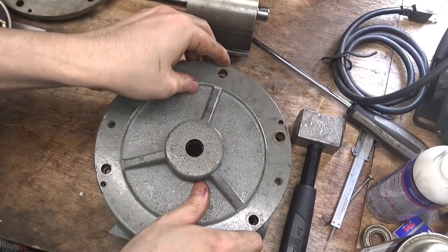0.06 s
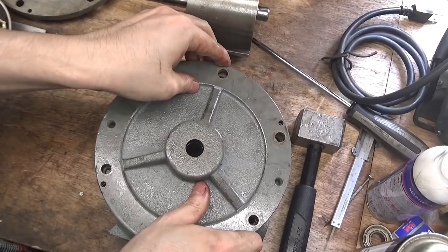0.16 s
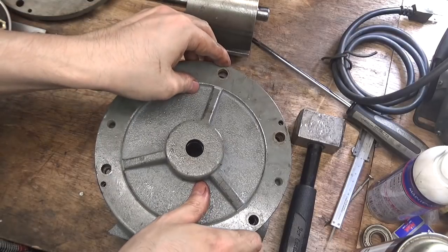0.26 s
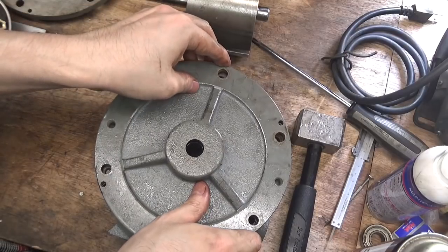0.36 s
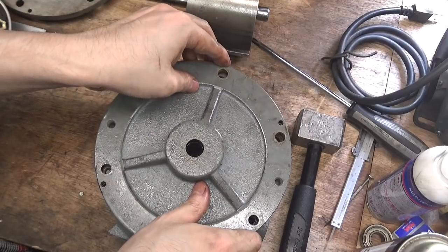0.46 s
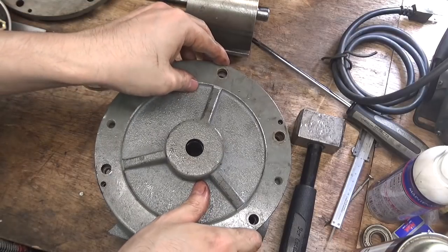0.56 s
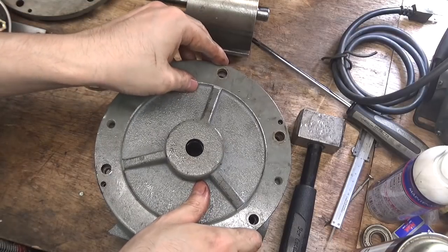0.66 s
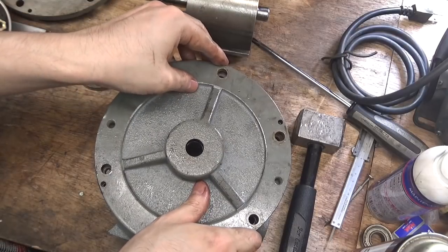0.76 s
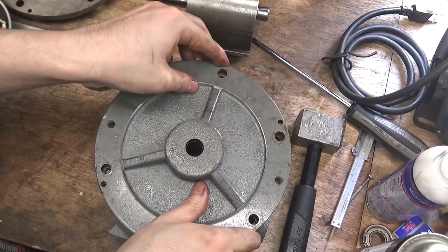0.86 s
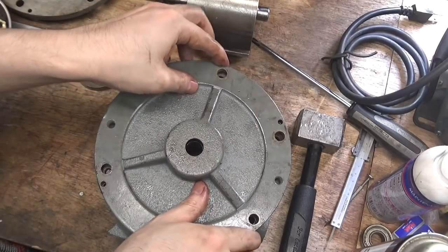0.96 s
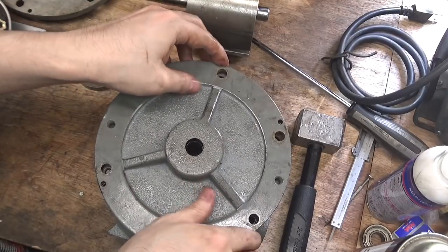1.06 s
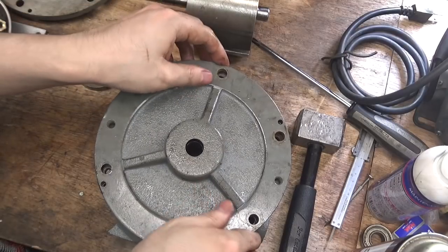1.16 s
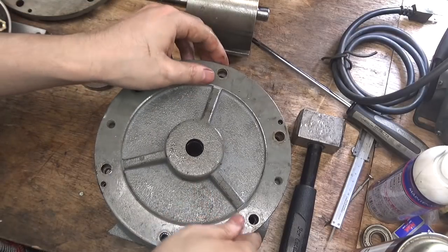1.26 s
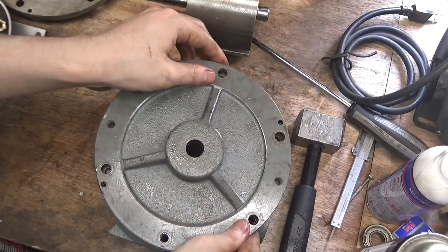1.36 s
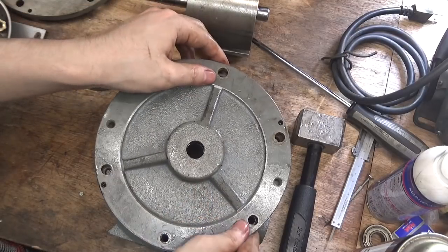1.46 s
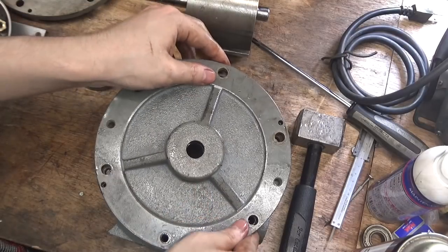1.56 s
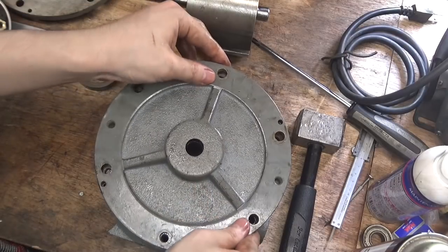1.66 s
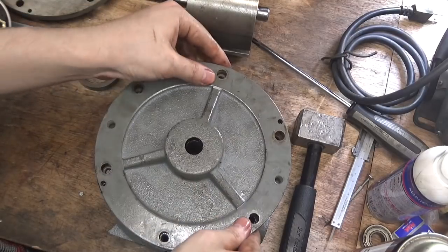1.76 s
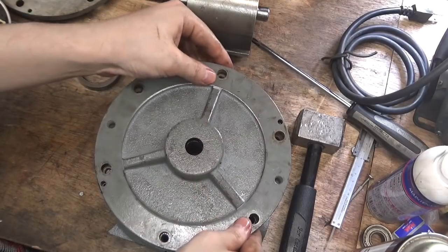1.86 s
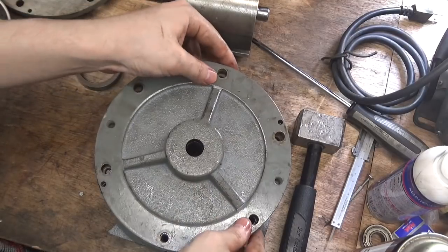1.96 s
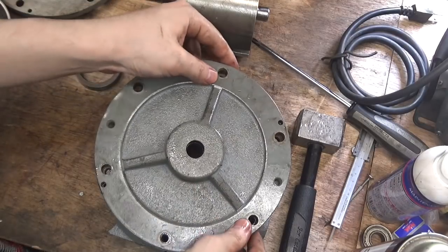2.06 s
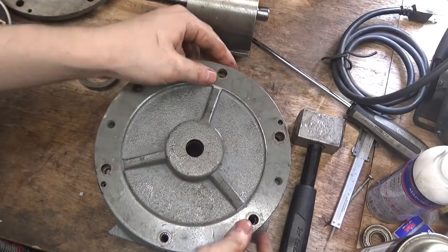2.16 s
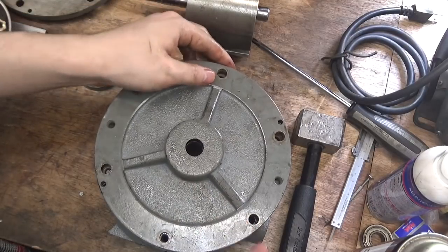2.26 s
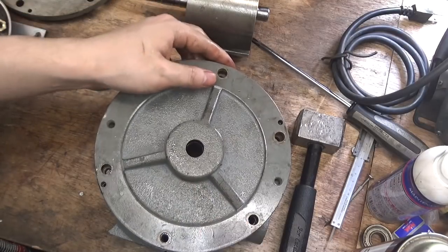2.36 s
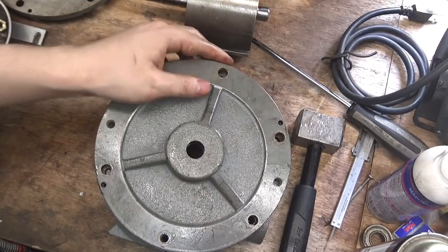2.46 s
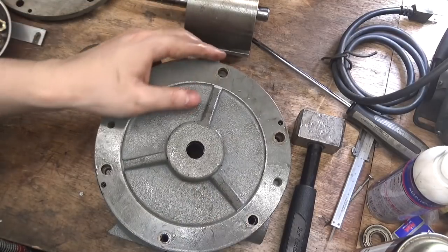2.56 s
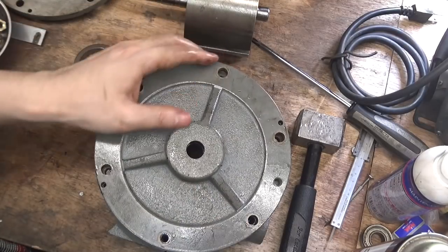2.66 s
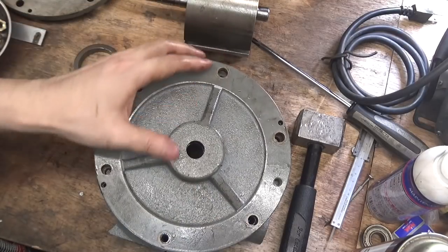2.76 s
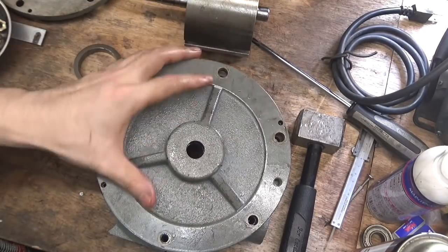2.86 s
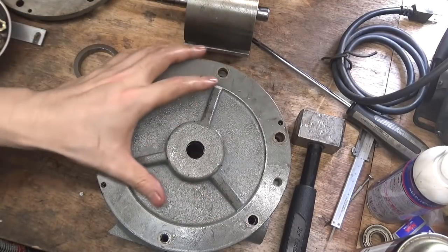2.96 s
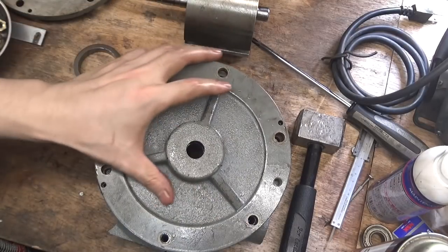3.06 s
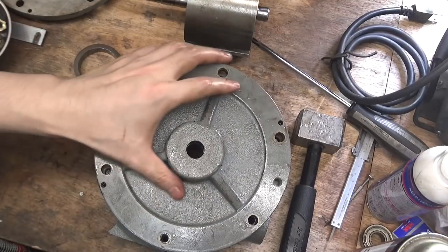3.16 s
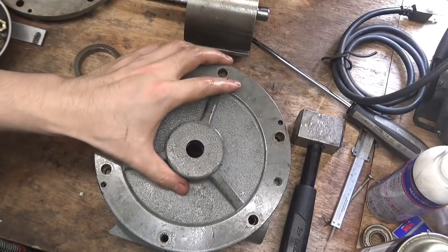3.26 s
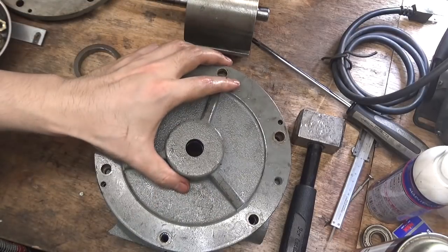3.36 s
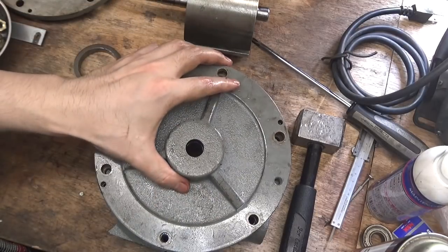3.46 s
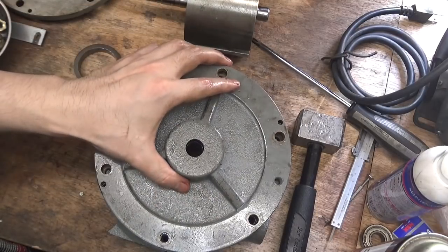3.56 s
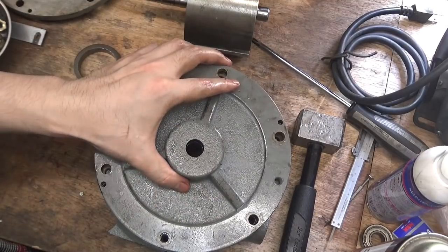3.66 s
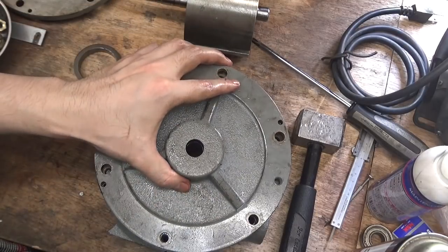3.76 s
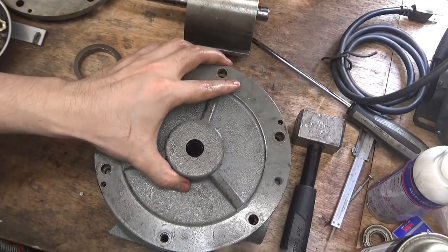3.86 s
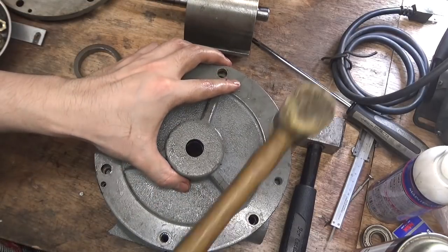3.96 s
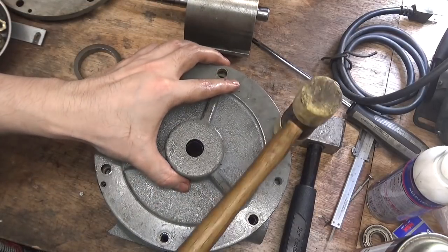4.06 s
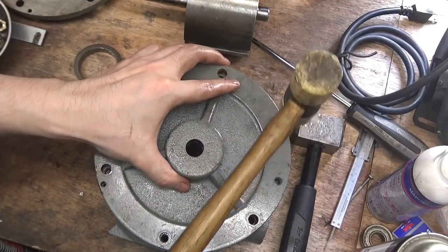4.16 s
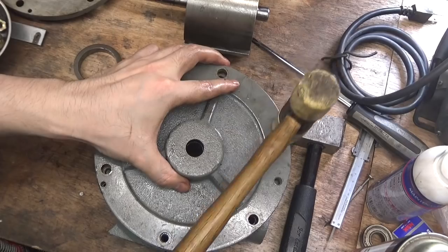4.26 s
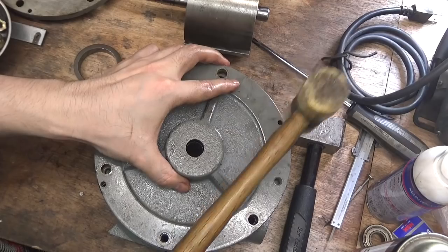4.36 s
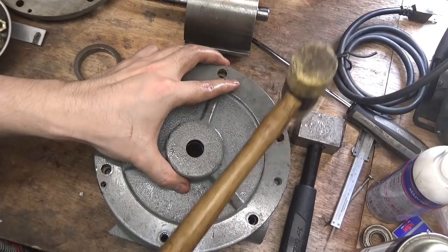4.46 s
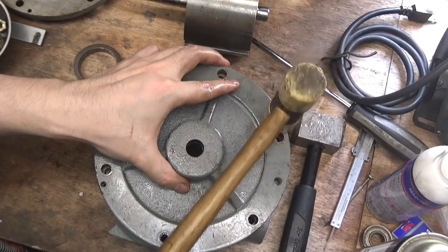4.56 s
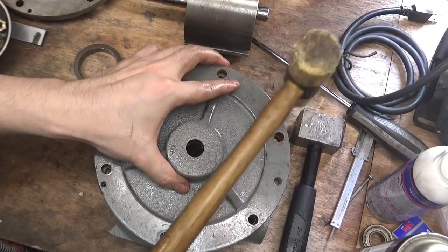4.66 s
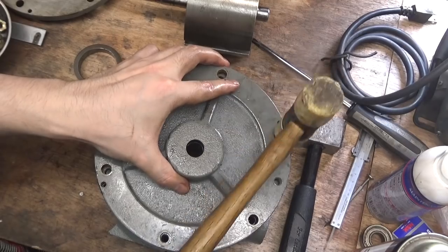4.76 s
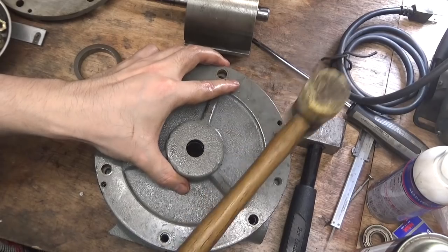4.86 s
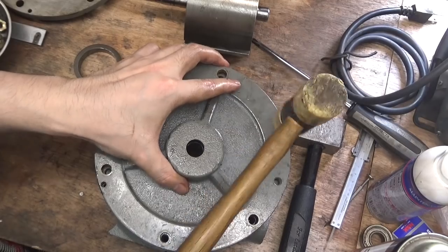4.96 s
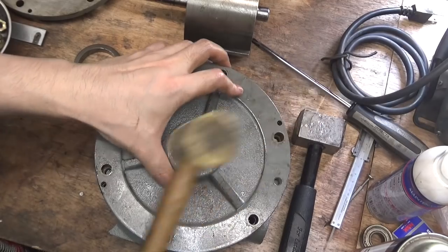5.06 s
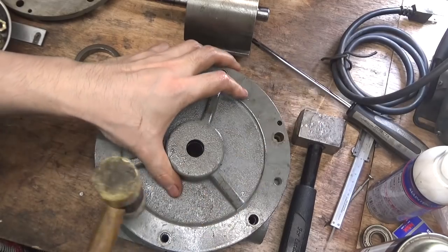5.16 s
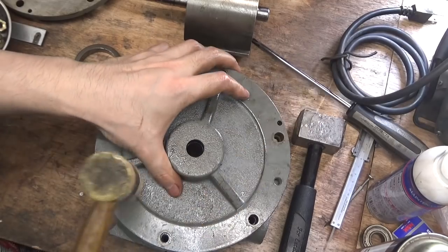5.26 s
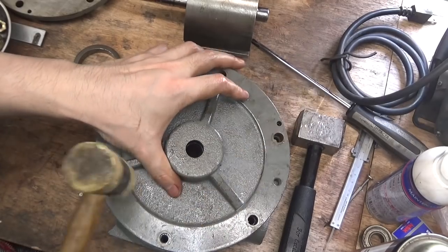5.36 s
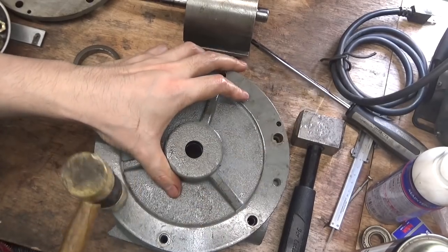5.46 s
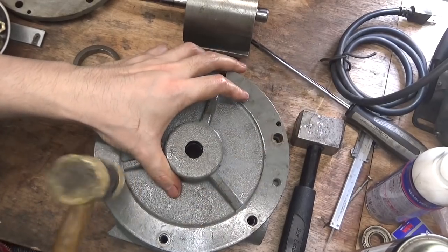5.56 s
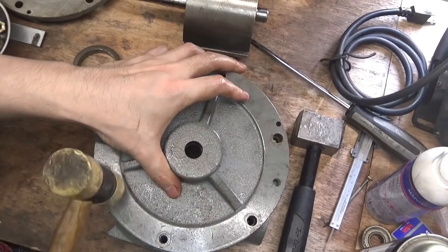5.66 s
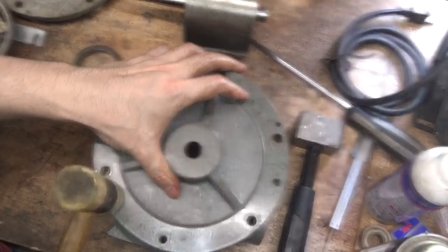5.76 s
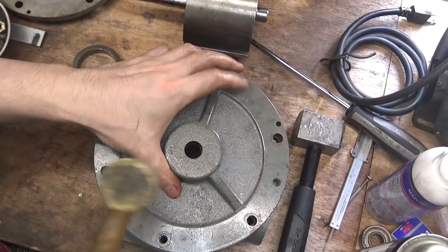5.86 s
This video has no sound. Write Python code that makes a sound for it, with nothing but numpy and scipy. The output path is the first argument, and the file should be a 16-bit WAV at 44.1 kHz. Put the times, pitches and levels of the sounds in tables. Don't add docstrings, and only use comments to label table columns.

```python
import sys
import numpy as np
from scipy import signal
from scipy.io import wavfile
from scipy.ndimage import uniform_filter1d

SR = 44100
rng = np.random.default_rng(int(sys.argv[2]) if len(sys.argv) > 2 else 0)


def natural_amplitude(level_db):
    exponent = np.asarray(level_db, float) / 20
    return 10 ** exponent


def digitize_waveform(pressure):
    field = np.atleast_2d(pressure).T
    bounded = np.clip(field, -1, 1)
    quanta = np.round(bounded * 32767).astype(np.int16)
    wavfile.write(sys.argv[1], SR, quanta)


N = 260631
TIME_S = np.arange(N) / SR

CUT_S, AS_SHOT, SPEED_UP = 3.557, 1, 1.935
AIR_DB, AIR_FAST_DB = -57, -71
HUM_HZ, FRAME_HZ = 58.75, 29.97
TICKS_PAUSE_START_S, TICKS_PAUSE_END_S = 3.76, 5.05
ROD_HZ, ROD_T60_S = 1430, 0.85
ROD_PRESSED_HZ, ROD_PRESSED_DAMPING = 1368, 3.3
ROOM_DB, ROOM_T60_S = -28, 1
LOWS_LAG_HZ = 400
LOW_MODE_HZ, LOW_CLEAN_DB, LOW_BUZZ_DB = 700, 7, -4
CLEAN_LONGER = 1.12
ROCK_HOLD_S, DROP_HOLD_S, SHOVE_HOLD_S, PICK_UP_HOLD_S = 0.025, 0.004, 0.018, 0.0017
FIRST_TAP_HOLD_S, RIGHT_HOLD_S, LEFT_HOLD_S = 0.0039, 0.02, 0.024

# (frequency [Hz], density [dB/Hz])
AIR = [(15, -58), (25, -15.5), (114, -19), (146, -15), (225, -4), (321, -13.5), (348, -6), (377, -11),
       (469, -4.5), (649, -6.5), (806, -7.5), (1770, -11), (3130, -14), (15100, -29), (16400, -36)]
AIR_FAST = [(15, -59), (25, -32), (53, -34), (181, -17), (231, -34), (321, -47), (456, -4), (537, -18),
            (667, 1), (743, -40), (1000, -49), (1090, -10.5), (3310, -18.5), (5390, -18.5), (16400, -32)]
# (frequency [Hz], likeness [0-1])
AIR_LIKENESS = [(60, 0.85), (150, 1), (300, 0.7), (550, 0.83), (1650, 0.54), (4970, 0.35), (15000, .4)]
HIT_LIKENESS = [(60, 0.93), (150, 0.98), (300, .92), (550, .9), (1650, 0.6), (4970, 0.7), (15000, 0.3)]
# (multiple [1], level [dB])
HUM = [(2, -77), (4, -74), (5, -73), (6, -64.5), (7, -70), (8, -67), (9, -68), (10, -71), (14, -71),
       (26, -79)]
# (frequency [Hz], level [dB], t60 [s])
TICK_MODES = [(2690, 6, 0.015), (3050, 10.5, 0.0035), (3520, 10.5, 0.0033), (3860, -7.5, 0.011)]
RATTLE_MODES = [(4644, 1, 0.015), (5550, -1, .008), (7090, 0, .008), (10200, 1, 0.0066),
                (11300, -15, 0.0051), (13500, -6.5, .002)]
# (time [s], peak [dB])
RATTLES = [(4.1242, -41), (4.1365, -44), (4.15, -48), (4.2902, -39), (4.3009, -43), (4.307, -48),
           (4.463, -31), (4.4774, -44), (4.4879, -47.5), (4.522, -69), (4.684, -61), (5.223, -40),
           (5.2538, -57), (5.8454, -38), (5.8543, -40), (5.8675, -47), (5.8752, -47), (5.8858, -53)]
# (time [s], level [dB])
ROD = [
    (1.515, -37),
    (1.795, -38.5),
    (2.552, -45),
    (4.598, -43.5),
    (4.778, -54),
    (4.933, -60),
    (5.336, -55.5),
    (5.487, -56),
    (5.641, -54.5),
    (5.801, -54),
]
# (time [s], level [dB])
BENCH_SWAY = [
    (.625, -60),
    (1.531, -56),
    (1.81, -57.5),
    (2.56, -68),
]
# (time [s], level [dB])
RIM_RING = [
    (5.338, -48),
    (5.488, -33),
    (5.646, -39),
    (5.803, -41),
]

# (time [s], drag level [dB])
SLIDE = [
    [(2.89, -77), (2.91, -59.5), (2.932, -53.5), (2.98, -66)],
    [(3.03, -53), (3.1, -50.5), (3.17, -43), (3.25, -44), (3.3, -43.5), (3.335, -48.5), (3.375, -45),
     (3.436, -53), (3.47, -60.5), (3.55, -65)],
]
# (frequency [Hz], density [dB/Hz])
SLIDE_HISS = [(590, -45), (1000, -5.5), (1840, -1.5), (2070, -1.5), (2380, 0.5), (2640, 2), (3080, -1.5),
              (3380, 1), (4420, -0.5), (5400, -1), (7400, -13.5), (9350, -11), (12500, -20.5), (15100, -23),
              (16400, -33.5)]
# (frequency [Hz], width [Hz], level [dB])
SLIDE_RING = [(2430, 290, -28), (3140, 120, -7.5), (4440, 300, -4), (8900, 700, -7.5), (9560, 1100, -4.5),
              (10710, 550, -8)]
SLIDE_BODY = [(284, 30, -3.5), (406, 63, -2.5), (560, 60.6, 1), (806, 62, 2.5)]

# (time [s], metal ring [dB], bench thud [dB], seat ring [dB], seat pitch [Hz])
NUDGES = [
    (0.306, -50, -46.5, -40, 587),
    (0.6125, -26, -26.5, -19, 568.6),
    (2.718, -40, -44, -34.5, 439),
]
ROCKS = [
    (1.512, -6.5, -19.5, -17, 580),
]
DROPS = [
    (1.7953, -7.5, -19, -8, 582.6),
]
SEATING = [
    (2.5495, -15, -26, -13, 568),
]
SHOVE = [
    (3.0205, -29, -19.5, -11, 574.3),
]
PICK_UP = [
    (3.779, -49, -64, -65, 1280),
    (3.794, -45, -54.5, -38, 1304),
    (3.855, -55, -59, -44.5, 1057),
    (3.935, -59.5, -60.5, -50, 1290),
]
FIRST_TAPS = [
    (4.108, -16.5, -31.5, -15.5, 1068),
    (5.21, -20.5, -38, -12, 1033),
]
TAPS_RIGHT = [
    (4.2749, -15.5, -34, -32.5, 1077),
    (4.436, -15, -32.5, -32, 1082),
]
TAPS_RIGHT_HOME = [
    (4.6003, -10.5, -31, -34.5, 1115),
    (4.775, -13, -30.5, -28.5, 1120),
    (4.934, -12, -30, -29, 1113),
]
TAPS_LEFT = [
    (5.3367, -14.5, -31, -20.5, 1000),
    (5.486, -12.5, -32.5, -20.5, 957),
    (5.645, -13, -31.5, -22.5, 1005),
    (5.8019, -13, -30, -23.5, 1000),
]

# (frequency [Hz], level [dB], t60 [s])
COVER_ROCKING = [(2003, -18, .14), (2498, -14, .12), (2820, -11, 0.12), (3040, -6, .1), (3082, -4, 0.11),
                 (3199, -4, .1), (3670, -8, .11), (3800, -1.5, .11), (4035, -9, .1), (4446, -9, 0.09),
                 (4546, -5, 0.095), (4657, -9, 0.095), (4792, -9, .1), (5044, -15, .1),
                 (6680, -18, 0.1), (7365, -19, 0.11), (9250, -23.5, 0.17), (10260, -25.5, 0.16)]
COVER_DROPPED = [(926, -11, 0.12), (1410, -12, 0.11), (2076, -8, 0.13), (2540, -11, 0.09),
                 (2599, -13, 0.12), (2668, -9, 0.11), (3148, -7, 0.1), (3735, -4, 0.075), (3967, -12, .12),
                 (4485, -6, .1), (4651, -6, 0.09), (4845, -9, 0.1), (6660, -27, 0.12), (9200, -34, 0.1)]
COVER_SEATED = [(1190, -3, 0.025), (1630, -10, 0.098), (2080, -14.5, 0.15), (2420, -12, 0.15),
                (3090, -0.5, 0.07), (3140, -10, 0.17), (3400, -12, 0.09), (3692, -3, 0.17),
                (3870, -2, 0.15), (4090, -16, 0.1), (4690, -21.5, 0.17), (5033, -47, 0.11),
                (6686, -28, 0.14), (7400, -26, 0.14)]
COVER_HELD = [(920, -14.5, .12), (1410, -6.5, 0.052), (2130, -7.5, 0.1), (2500, -15, 0.23),
              (2720, -8, 0.12), (2980, -4.5, .1), (3610, -7.5, 0.13), (4274, -12, 0.17),
              (4580, -19.5, 0.17), (7500, -19, .04), (9400, -20, 0.046)]
MALLET = [(2440, -2, 0.012), (4960, -2, 0.0088), (6560, -4, 0.0093)]
RIM_LOOSE = [(3530, -5, 0.028), (3970, -1.5, 0.054), (4400, -4.5, 0.087), (5100, -0.5, .04),
             (5860, -0.5, 0.053), (7400, -3.5, 0.084), (8600, -4, 0.07), (9900, -17, 0.03),
             (10700, -17, 0.07), (12870, -28, 0.087)]
RIM_RIGHT = [(704, -15.5, 0.1), (2380, -14, 0.14), (2650, -9, 0.11), (3140, 1, 0.074), (4130, -10, 0.066),
             (4630, -2, 0.067), (5020, -3.5, 0.07), (5900, -4.5, 0.059), (7150, -4.5, 0.044),
             (7380, -8.5, 0.046), (7670, -5, 0.059), (8790, -8, 0.08), (10170, -17, 0.073),
             (12850, -29, 0.067)]
RIM_RIGHT_HOME = [(2283, -15.5, 0.14), (2670, -13, 0.083), (3080, -7.5, 0.1), (4200, -15, 0.08),
                  (4490, -2.5, 0.072), (5000, -10, 0.12), (6000, -5.5, 0.065), (6840, -9, 0.1),
                  (7190, -6.5, 0.067), (8690, -6.5, 0.066), (9700, -16.5, 0.09), (10490, -21, 0.11),
                  (13150, -22, 0.093)]
RIM_LEFT = [(3000, -10, 0.032), (3980, -6.5, 0.05), (4600, -8.5, 0.088), (4900, -8.5, 0.071),
            (6140, -8, 0.06), (6570, -7.5, 0.06), (7100, -6.5, 0.058), (7640, -9, 0.066),
            (7820, -8.5, 0.092), (8750, -4.5, 0.084), (10100, -10.5, 0.054), (10750, -12.5, 0.069),
            (11300, -16, .06), (12910, -11.5, .075)]
# (multiple of seat pitch [1], level [dB], t60 [s])
SEAT_ON_BENCH = [(.312, -13, 0.2), (.4, -19, .15), (.525, -17, .17), (.625, -16, .18), (.93, -1, .13),
                 (0.97, -5, .03), (1.005, -2, .13), (1.066, -2.5, .12), (1.183, -12, .1), (1.35, -13, 0.08)]
SEAT_HELD = [(.3, -7, .2), (0.521, -29, 0.6), (.625, -13.5, 0.42), (.76, -12, 0.24), (.83, -1, 0.1),
             (0.869, -2, 0.14), (.925, -4, 0.2), (1.2, -6, 0.19)]
SEAT_SHOVED = [(.39, -22, .13), (.47, -11, .13), (.61, -14, .12), (.702, -6, .15), (.9, -9, .1),
               (.989, 1, .125), (1.118, -14, .09), (1.22, -15, .09), (1.36, -14, .1), (1.45, -14, .11)]
SEAT_MALLET = [(1.0004, 0, 0.021)]
SEAT_LOOSE = [(.64, -15, 0.21), (.94, -13, .05), (1.0001, 3, 0.079), (1.13, -2, 0.1), (1.19, -14.5, .05),
              (1.33, -18, 0.093)]
SEAT_HOME = [(0.632, 5.5, 0.16), (.72, -3, 0.23), (.78, -12, 0.13), (.87, -35, 0.11), (0.933, 7, 0.17),
             (1.002, 7.5, .1), (1.065, 9, 0.13), (1.31, -1, 0.16)]
SEAT_PRESSED = [(.71, -10, .1), (.86, -19, .1), (.965, -18, 0.13), (1.001, 2.5, 0.15), (1.06, -2, .09),
                (1.17, -14, 0.077), (1.3, -24, 0.1)]
# (frequency [Hz], density [dB/Hz])
KNOCK_WASH = [(24, -58), (40, -20.5), (120, -42), (180, -36), (433, -24), (542, 2.5), (1070, -13),
              (3470, -10.5), (4680, 2), (5580, -37), (10200, -31), (16000, -73)]
TAP_WASH = [(24, -67.5), (40, -18), (200, -24), (310, -10), (688, -8.5), (978, -2), (1700, -6),
            (3040, -13.5), (8740, -12), (13100, -26), (16400, -38)]
# (frequency [Hz], t60 [s])
KNOCK_T60 = [(100, 0.63), (260, 0.15), (700, 0.2), (1840, 0.11), (4850, 0.16)]
TAP_T60 = [(200, 0.27), (530, 0.25), (1390, 0.13), (3680, 0.16), (9700, 0.098)]


def rms_one(x):
    return x / np.sqrt(np.mean(x ** 2) + 1e-20)


def at_hz(points, hz):
    table_hz, value = np.array(points).T
    return np.interp(np.log(hz), np.log(table_hz), value)


def drift(rate_hz):
    return np.interp(TIME_S * rate_hz, np.arange(600), rng.standard_normal(600))


def butter(x, order, hz, kind):
    return signal.sosfilt(signal.butter(order, hz, kind, fs=SR, output="sos"), x)


def ring(clicks, hz, t60_s):
    radius, turn = natural_amplitude(-60 / (t60_s * SR)), 2 * np.pi * hz / SR
    poles = [1, -2 * radius * np.cos(turn), radius * radius]
    return signal.lfilter([0, np.sin(turn)], poles, clicks + 1e-18)


def bands(spectrum, likeness, size):
    edges_hz = 24 * 2 ** np.arange(0, 9.7, 1 / 3)
    white = rng.standard_normal((2, 2, size))
    out = []
    for k, (low_hz, high_hz) in enumerate(zip(edges_hz, edges_hz[1:])):
        mid, side = butter(white[k % 2], 2, [low_hz, high_hz], "band")
        hz = np.sqrt(low_hz * high_hz)
        alike = np.clip(at_hz(likeness, hz), 0, 1)
        stereo = np.sqrt(1 + alike) * mid + np.sqrt(1 - alike) * side * [[1], [-1]]
        out.append((hz, natural_amplitude(at_hz(spectrum, hz)) * stereo))
    total = np.sqrt(sum(np.mean(band ** 2) for hz, band in out))
    return [(hz, band / total) for hz, band in out]


def workshop(spectrum, air_db, speed, hum_db, tick_db, first_s, last_s):
    air = sum(band * natural_amplitude(0.8 * drift(8)) for hz, band in bands(spectrum, AIR_LIKENESS, N))
    turns = np.cumsum(HUM_HZ * speed * (1 + 0.001 * drift(2))) / SR
    hum = sum(natural_amplitude(db + 1.4 * drift(2.8)) * np.sin(2 * np.pi * (round(k) * turns + rng.random()))
              for k, db in HUM)
    at_s = np.arange(first_s, last_s, 1 / (FRAME_HZ * speed))
    at_s = at_s[(at_s < TICKS_PAUSE_START_S) | (at_s > TICKS_PAUSE_END_S)]
    count = len(at_s)
    clicks = np.zeros(N)
    clicks[(at_s * SR).astype(int)] = natural_amplitude(-4 * (np.arange(count) % 2) + 0.8 * rng.standard_normal(count))
    scratch = signal.lfilter([0.035], [1, -0.993], clicks) * rng.standard_normal(N)
    clicks = 0.72 * clicks + scratch
    ticks = sum(natural_amplitude(db) * ring(clicks, hz * speed, t60_s / speed) for hz, db, t60_s in TICK_MODES)
    ticks = butter(ticks, 2, [2400 * speed, 4300 * speed], "band")
    return natural_amplitude(air_db) * air + natural_amplitude(hum_db) * hum + natural_amplitude(tick_db) * ticks


def struck(events, hz, t60_s):
    clicks = np.zeros(N)
    for s, db in events:
        clicks[round(s * SR)] = natural_amplitude(db)
    return ring(clicks, hz, t60_s)


def rattles():
    clicks = np.zeros(N)
    for s, db in RATTLES:
        clicks[round(s * SR)] = natural_amplitude(db - 8)
    mid, side = signal.lfilter([1], [1, -0.9], clicks) * rng.standard_normal((2, N))
    burst = mid + 0.4 * side * [[1], [-1]]
    return sum(natural_amplitude(db) * ring(burst, hz, t60_s) for hz, db, t60_s in RATTLE_MODES)


def squeak():
    age_s = TIME_S - 1.5
    start_hz, rise_hz_per_s, length_s = 3160, 8000, 0.0063
    chirp = np.sin(2 * np.pi * (start_hz + rise_hz_per_s * age_s / 2) * age_s)
    return natural_amplitude(-50) * np.exp(-(age_s / length_s) ** 2) * chirp


def slide():
    rows = []
    for stroke in SLIDE:
        top_db = max(db for s, db in stroke)
        points = [(stroke[0][0] - 0.01, -150), *stroke, (stroke[-1][0] + 0.01, -150)]
        rows += [(s, db, db - top_db) for s, db in points]
    at_s, level_db, relative_db = np.array(rows).T
    drag_db = np.interp(TIME_S, at_s, level_db)
    below_top_db = np.interp(TIME_S, at_s, relative_db)
    bright_db = np.maximum(-2 + 0.47 * below_top_db, -16)
    grit, slips = drift(60), rng.standard_normal(N)
    parts = [(hz, natural_amplitude(0.5 + 2 * grit + 2 * drift(25)) * band)
             for hz, band in bands(SLIDE_HISS, HIT_LIKENESS, N)]
    for hz, width_hz, db in SLIDE_RING:
        tone = ring(ring(slips, hz, 2 / width_hz), hz, 2 / width_hz)
        parts.append((hz, natural_amplitude(db - 6 + 2.5 * drift(30)) * rms_one(tone)))
    hiss = sum(part * natural_amplitude((bright_db + 5) * (hz > 7000)) for hz, part in parts)
    body = sum(natural_amplitude(db + 4 * drift(20)) * rms_one(ring(slips, hz, 2.2 / width_hz))
               for hz, width_hz, db in SLIDE_BODY)
    rumble = natural_amplitude(-23 + 0.62 * drag_db) * rms_one(butter(body, 3, 190, "high"))
    return (natural_amplitude(drag_db - 0.5) * hiss + rumble) * natural_amplitude([[-1.5], [1.5]])


def blows(events, modes, seat, wash, decay, speed, hold_s, clean_db, ring_db, thud_db, middle_db,
          sheen_db, pan_db, contact_hz):
    out, size = np.zeros((2, N + SR)), round(0.3 * SR)
    age_s = np.arange(size) / SR
    after_s = np.maximum(age_s - hold_s, 0)
    for s, metal_db, bench_db, seat_db, seat_hz in events:
        mid, side = rng.standard_normal((2, size))
        hit = np.zeros((2, size))
        all_modes = [(hz, metal_db + db, t60_s) for hz, db, t60_s in modes]
        all_modes += [(m * seat_hz, seat_db + db, t60_s) for m, db, t60_s in seat]
        for hz, db, t60_s in all_modes:
            memory_s = t60_s * 0.25
            buzz = mid + min(0.5, hz / speed / 1800) * side * [[1], [-1]]
            buzz[:, 0] = 1.25 * np.sqrt(memory_s * SR / np.log(1000))
            low = hz < LOW_MODE_HZ * AS_SHOT / speed
            swell = 1 - np.exp(-age_s * hz * 0.9)
            fall = natural_amplitude(-60 * after_s / t60_s)
            rough = ring(ring(buzz, hz, memory_s), hz, 8 / hz) * fall
            rough *= np.sqrt(np.sum(fall ** 2) / np.sum(rough ** 2))
            hit += natural_amplitude(db + ring_db + LOW_BUZZ_DB * low) * swell * rough
            clean = np.sin(2 * np.pi * hz * age_s) * natural_amplitude(-60 * after_s / (CLEAN_LONGER * t60_s))
            hit += natural_amplitude(db + ring_db + clean_db + LOW_CLEAN_DB * low) * swell * clean
        hit *= 1 - np.exp(-age_s * speed / 0.0006)
        hit = butter(hit, 3, [170 * speed, contact_hz], "band")
        middle = (bench_db + metal_db) / 2 + middle_db
        wash_db = [bench_db + thud_db, middle, middle, metal_db + sheen_db]
        for hz, band in bands(wash, HIT_LIKENESS, size + 2000):
            part_db = np.interp(np.log(hz / speed), np.log([700, 1090, 1862, 2650]), wash_db)
            rise = 1 - np.exp(-age_s * hz * hz / speed / LOWS_LAG_HZ)
            room = natural_amplitude(ROOM_DB - 60 * age_s * speed / ROOM_T60_S)
            fall = natural_amplitude(-60 * after_s / at_hz(decay, hz)) + room
            hit += natural_amplitude(part_db) * fall * rise * band[:, 2000:]
        at = round(s * SR)
        out[:, at:at + size] += hit * natural_amplitude([[pan_db / 2], [-pan_db / 2]])
    return out[:, :N]


def knocks():
    groups = [   # events, modes, seat, hold [s], clean [dB], pan [dB]
        (ROCKS, COVER_ROCKING, SEAT_ON_BENCH, ROCK_HOLD_S, -14, 0.6),
        (DROPS, COVER_DROPPED, SEAT_ON_BENCH, DROP_HOLD_S, -11, 0.6),
        (SEATING, COVER_SEATED, SEAT_ON_BENCH, DROP_HOLD_S, -11, 0.2),
        (NUDGES, COVER_HELD, SEAT_HELD, DROP_HOLD_S, -11, 0.6),
        (SHOVE, [], SEAT_SHOVED, SHOVE_HOLD_S, -9, -3)]
    return sum(blows(events, modes, seat, KNOCK_WASH, KNOCK_T60, AS_SHOT, hold_s, clean_db=clean_db,
                     ring_db=-11, thud_db=-6, middle_db=-8.5, sheen_db=-25.5, pan_db=pan_db,
                     contact_hz=9500)
               for events, modes, seat, hold_s, clean_db, pan_db in groups)


def pick_up():
    return blows(PICK_UP, MALLET, SEAT_MALLET, TAP_WASH, TAP_T60, SPEED_UP, PICK_UP_HOLD_S, clean_db=-22,
                 ring_db=-6.5, thud_db=-4.5, middle_db=-4, sheen_db=-14.5, pan_db=0.5, contact_hz=12200)


def taps():
    groups = [   # events, modes, seat, hold [s], pan [dB]
        (FIRST_TAPS, RIM_LOOSE, SEAT_LOOSE, FIRST_TAP_HOLD_S, 0.1),
        (TAPS_RIGHT, RIM_RIGHT, SEAT_HOME, RIGHT_HOLD_S, -0.2),
        (TAPS_RIGHT_HOME, RIM_RIGHT_HOME, SEAT_HOME, RIGHT_HOLD_S, -0.3),
        (TAPS_LEFT, RIM_LEFT, SEAT_PRESSED, LEFT_HOLD_S, 0.6)]
    return sum(blows(events, modes, seat, TAP_WASH, TAP_T60, SPEED_UP, hold_s, clean_db=-11.5,
                     ring_db=-17.5, thud_db=-3.5, middle_db=-13.5, sheen_db=-24, pan_db=pan_db,
                     contact_hz=14500)
               for events, modes, seat, hold_s, pan_db in groups)


def scene():
    before = workshop(AIR, AIR_DB, AS_SHOT, hum_db=0.99, tick_db=-55, first_s=0.0498, last_s=CUT_S)
    before += struck(ROD, ROD_PRESSED_HZ, ROD_T60_S / ROD_PRESSED_DAMPING)
    before += struck(BENCH_SWAY, 66, 0.54)
    before += squeak() + slide() + knocks()
    after = workshop(AIR_FAST, AIR_FAST_DB, SPEED_UP, hum_db=-12, tick_db=-70, first_s=3.568, last_s=5.9)
    after += struck(ROD, SPEED_UP * ROD_HZ, ROD_T60_S / SPEED_UP)
    after += struck(RIM_RING, 956, 0.22)
    after += rattles() + pick_up() + taps()
    share = np.clip((TIME_S - CUT_S) / 0.002, 0, 1)
    return (1 - share) * before + share * after


def roll_off(x):
    return signal.sosfilt(signal.butter(12, 15850, fs=SR, output="sos"), x)


def record(dry):
    duck = np.ones(N)
    for s, *levels in DROPS + SEATING + FIRST_TAPS + TAPS_RIGHT + TAPS_RIGHT_HOME + TAPS_LEFT:
        duck[round((s - 0.011) * SR):round((s - 0.002) * SR)] = 0.1
    top = signal.sosfiltfilt(signal.butter(2, 1600, "high", fs=SR, output="sos"), dry)
    mix = dry - (1 - uniform_filter1d(duck, size=60)) * top
    return roll_off(mix)


dry = scene()
out = record(dry)
digitize_waveform(out)
```